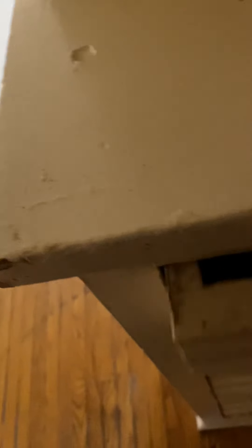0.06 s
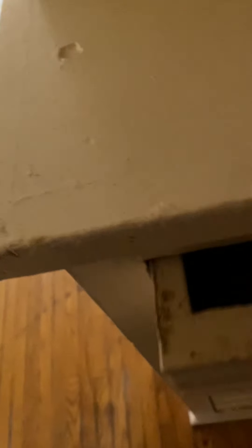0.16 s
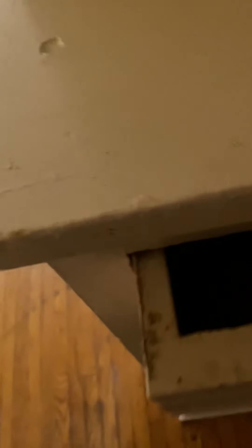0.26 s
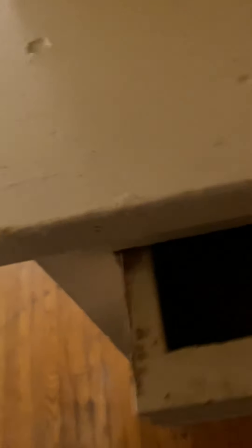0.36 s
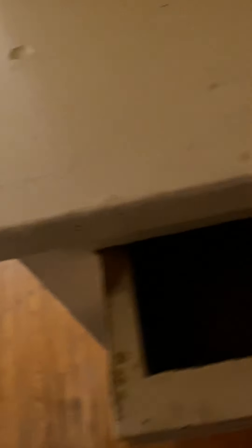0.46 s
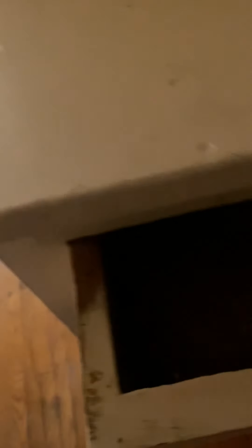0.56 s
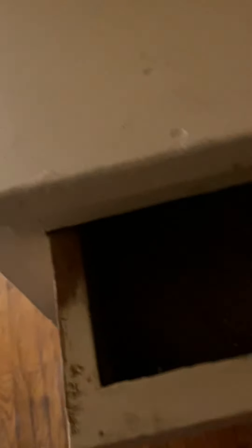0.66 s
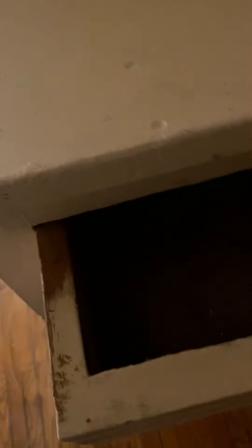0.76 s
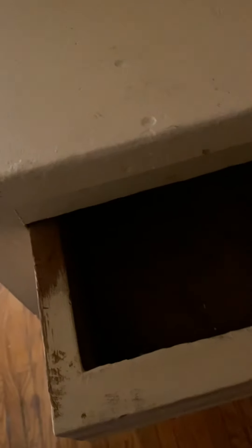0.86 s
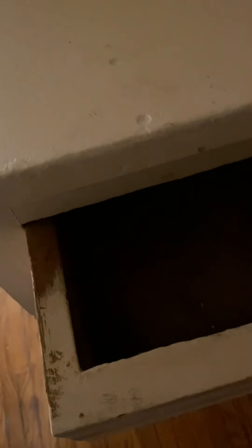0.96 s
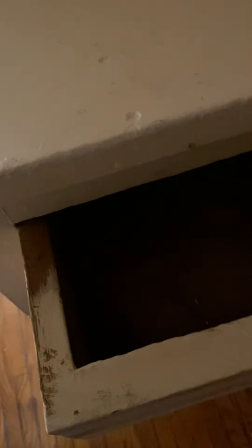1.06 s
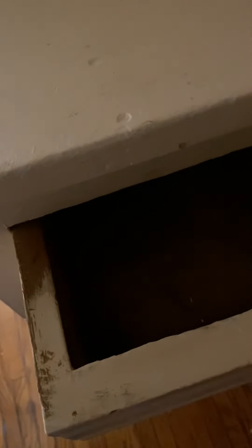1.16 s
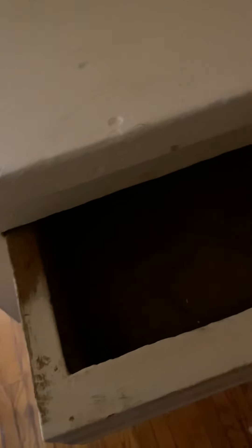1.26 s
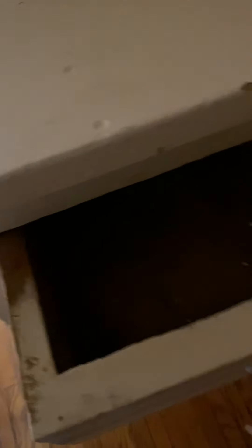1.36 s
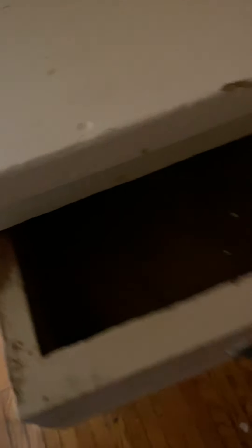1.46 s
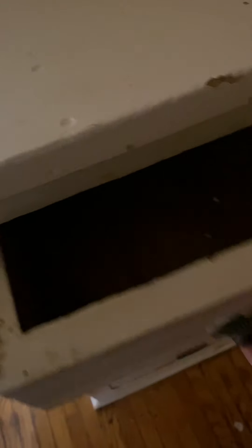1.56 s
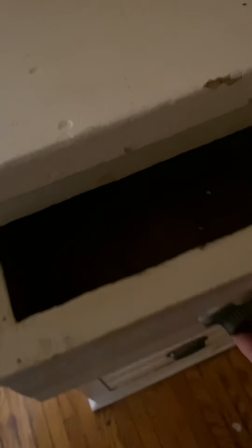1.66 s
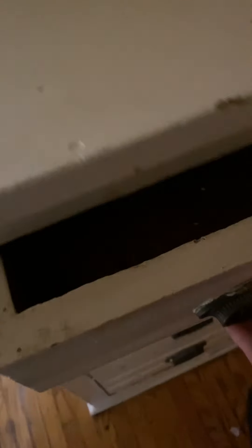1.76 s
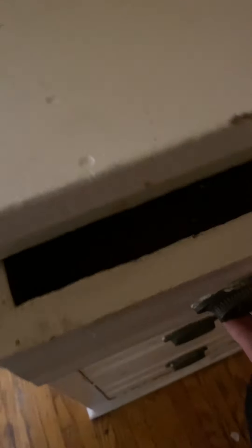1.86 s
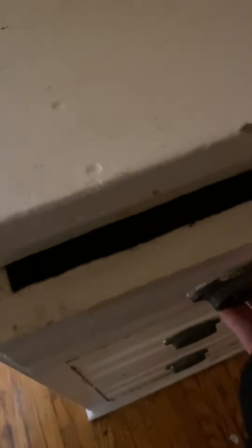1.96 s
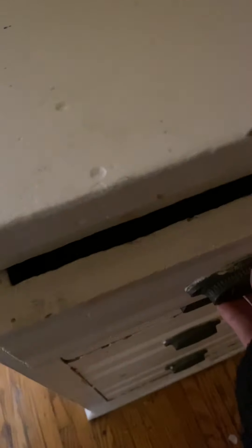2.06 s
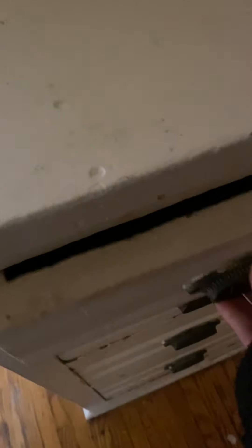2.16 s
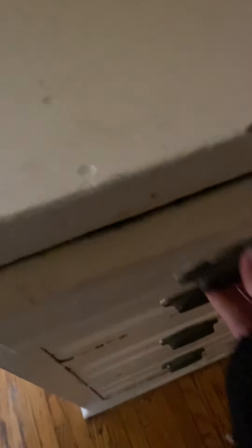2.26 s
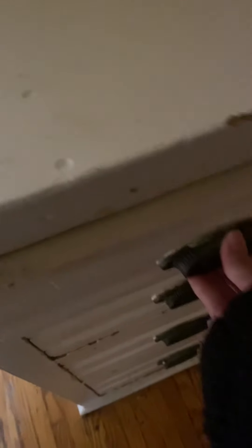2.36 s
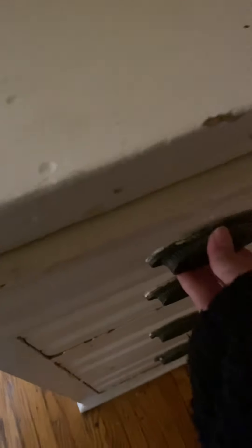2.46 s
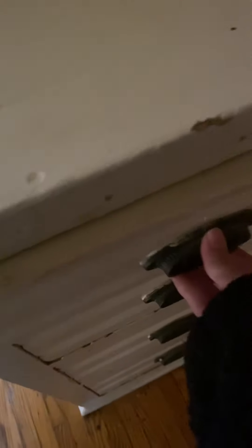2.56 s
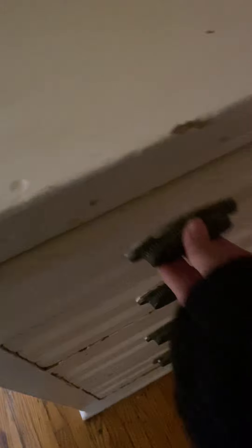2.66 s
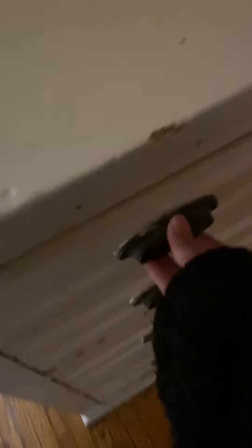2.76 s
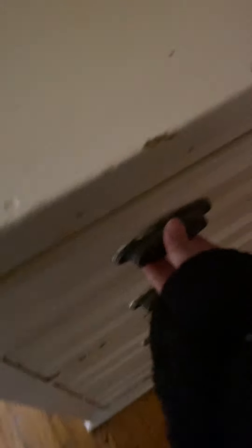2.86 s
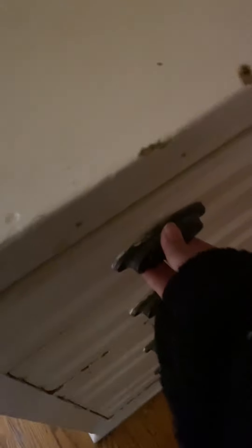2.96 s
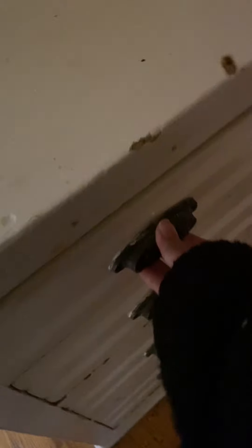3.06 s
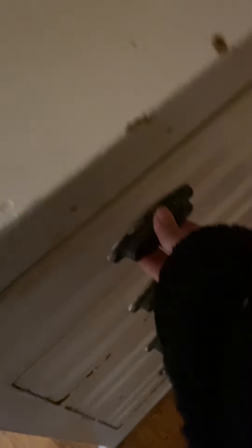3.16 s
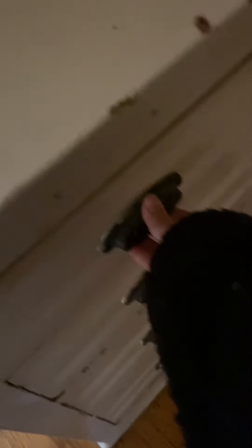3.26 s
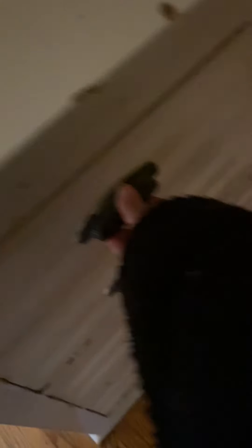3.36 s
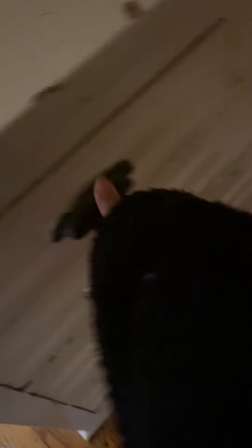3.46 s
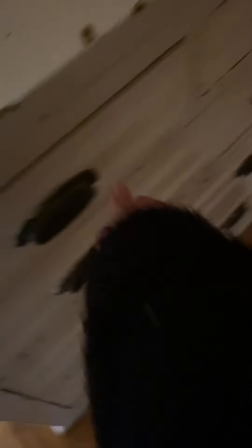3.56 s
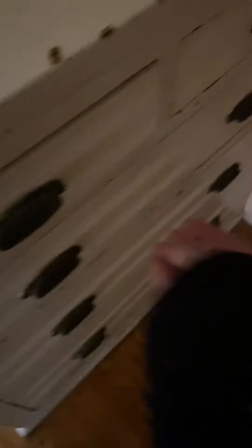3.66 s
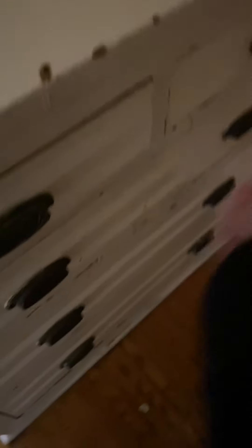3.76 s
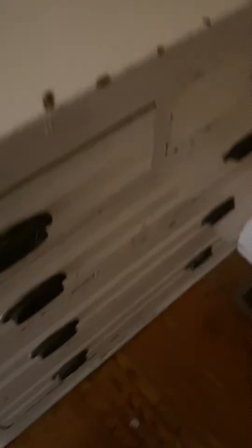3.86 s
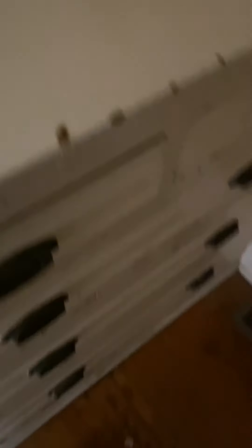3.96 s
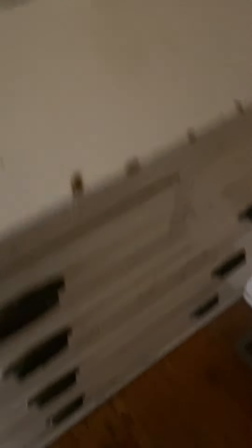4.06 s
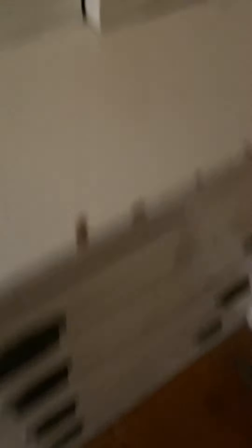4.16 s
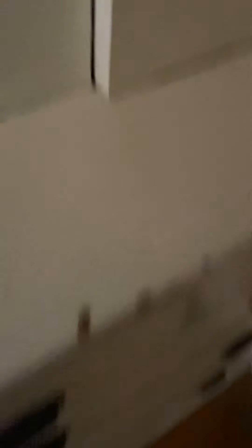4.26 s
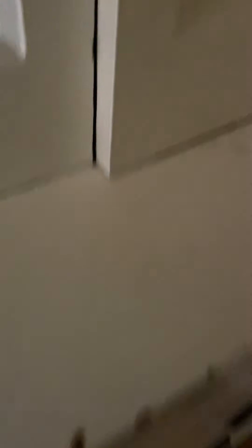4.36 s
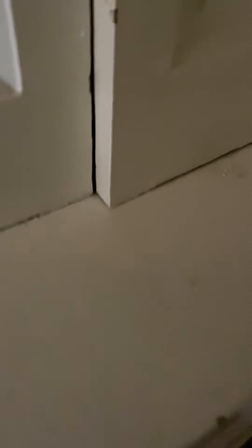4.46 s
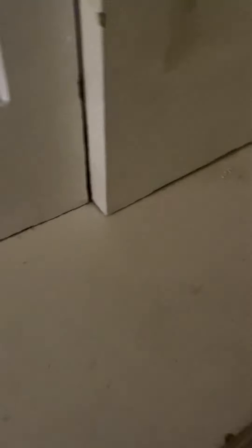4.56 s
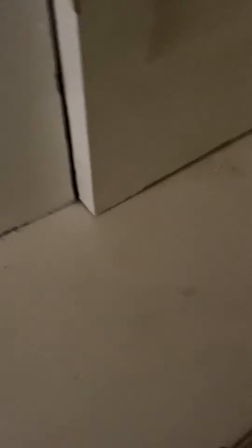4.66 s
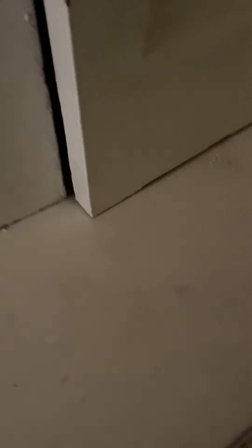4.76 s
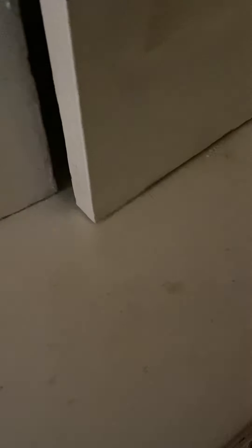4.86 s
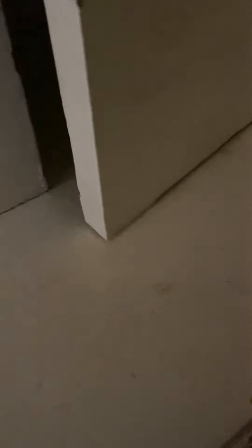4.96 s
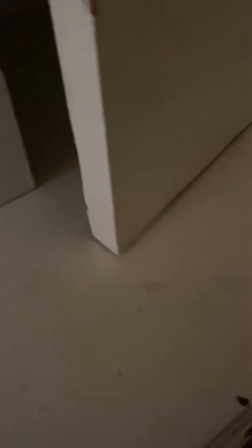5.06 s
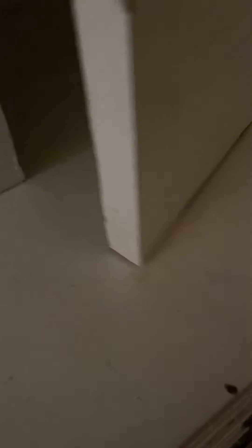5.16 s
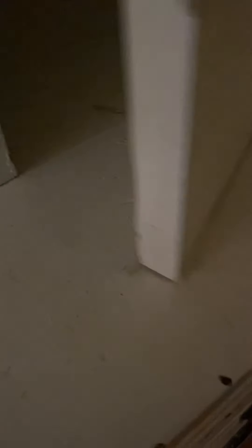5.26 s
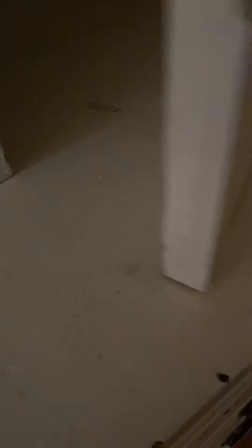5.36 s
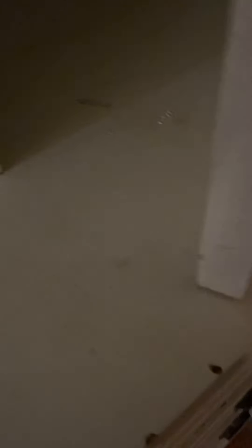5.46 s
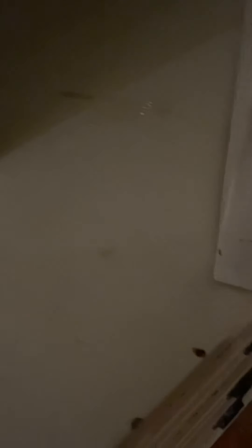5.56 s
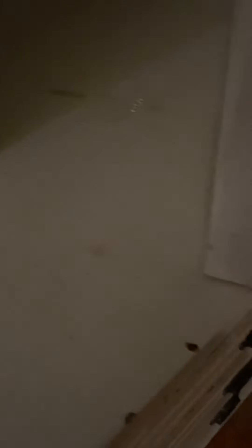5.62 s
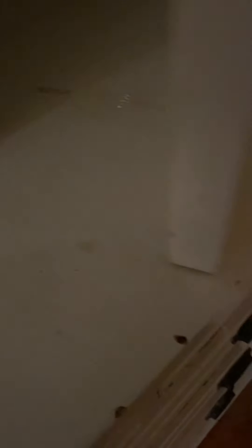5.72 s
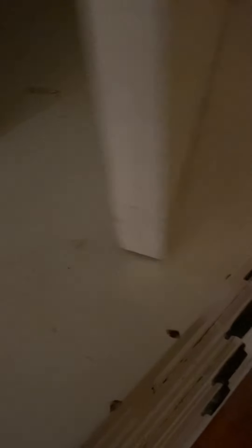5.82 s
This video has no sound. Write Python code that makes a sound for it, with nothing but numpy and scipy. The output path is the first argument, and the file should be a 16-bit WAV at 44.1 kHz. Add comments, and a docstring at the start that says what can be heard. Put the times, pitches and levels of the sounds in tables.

```python
"""A dull thud and rubbing wood start the scene: a drawer slides out, is pushed back, knocks,
squeaks and seats; then a cupboard door is tugged free of its catch and shudders open.
Rubbing, groans and a low hush are shaped noise; thuds and ticks are dying sines set off by contacts;
the short squeak is a stack of partials whose tone dies away in the room.
A bare room echoes blows, ticks and squeak; everything sounds close by."""
import sys
import numpy as np
from scipy import signal
from scipy.fft import rfft, irfft, next_fast_len
from scipy.io import wavfile
from scipy.ndimage import uniform_filter1d

SR = 44100
rng = np.random.default_rng(int(sys.argv[2]) if len(sys.argv) > 2 else 0)


def to_wav(sig):
    """Store sig (one row per channel, or 1-D mono) as 16-bit WAV at the path in sys.argv[1].

    Samples outside -1..1 are clipped; the rate is SR.
    """
    pcm = np.clip(np.atleast_2d(sig), -1, 1) * 32767
    pcm = np.round(pcm).astype(np.int16)
    wavfile.write(sys.argv[1], SR, pcm.T)  # frames by channels


N = 259749
PADDED = next_fast_len(N + SR // 2)
BINS = np.fft.rfftfreq(PADDED, 1 / SR)  # Hz

# strokes of wood and sleeve rubbing: [full from t/s, held/s, scrape level/dB, swell/(dB per s),
# fade/(dB per s), extra level/dB of the body, the part below SPLIT_HZ]
STROKES = [(0.0, .58, -56, 202, 189, 6.5), (1.231, 0.0031, -68, 1505, 236, 18),
           (1.41, .58, -56, 227, 92, 7), (2.21, 0.011, -55, 131, 299, 6), (2.253, 0.033, -44, 595, 376, 7),
           (2.554, 0.053, -56, 599, 107, 5), (2.615, 0.076, -50.5, 219, 215, 13),
           (2.78, 0.056, -56.5, 97, 186, 5), (2.95, 0.06, -65.5, 52, 44, 6),
           (3.255, 0.013, -56.5, 159, 200, 2), (3.276, 0.049, -46.5, 2500, 158, -3.5),
           (3.72, 0.017, -72, 282, 133, -33), (3.999, 0.012, -69, 174, 100, -13),
           (4.066, 0.0044, -55, 480, 186, -1), (4.15, 0.11, -67, 94, 91, 3.5),
           (4.398, 0.0053, -73, 1500, 297, 32.5), (4.583, 0.0082, -58, 2504, 293, 16),
           (4.609, 0.0041, -52.5, 2503, 801, 18), (4.653, 0.004, -47, 3001, 351, 9),
           (4.72, 0.012, -63, 110, 91.5, 18)]
SPLIT_HZ = 1860
# each stroke has a quieter tail, which falls at the same speed for all; a faint rustle never stops
LINGER_DB, LINGER_DB_PER_S, FAINTEST_DB = -15.5, 106.5, -86.5
# tone colour of the scrape, only relative: [f/Hz, level/(dB per Hz)]
SCRAPE_COLOUR = [(240, -28.5), (400, -8.5), (540, -7.5), (620, -14.5), (1400, -14.5), (1570, -10),
                 (1720, -13), (3000, -15), (4100, -17.5), (5330, -14), (7000, -22), (10000, -23.5),
                 (16000, -29)]
# where the rubbing sits: [t/s, left minus right level/dB]
RUB_PAN = [(0, -1), (2.9, -0.5), (5.89, -1)]
# tone colour of the rumble in the carcass, only relative: [f/Hz, level/(dB per Hz)]
RUMBLE_COLOUR = [(15, -66), (25, -4), (59, 3), (139, 0.5), (171, -0.5), (246, -3), (344, -11.5), (545, -22),
                 (910, -27.5), (1540, -120)]
# loudness of that rumble over time: [t/s, level/dB]
RUMBLE_LEVEL = [(0.0, -32.5), (0.1, -37), (0.6, -42.5), (0.76, -54), (1.2, -60.5), (1.42, -38),
                (1.95, -39.5), (2.12, -48.5), (2.33, -38), (2.55, -54), (2.7, -37), (2.86, -51), (3.6, -64),
                (4.0, -56.5), (4.2, -48), (4.58, -42.5), (4.7, -25), (4.84, -33), (4.93, -34.5),
                (5.2, -47.5), (5.89, -48.5)]

# dull blows on carcass and door:
# [t/s, peak level/dB, favoured f/Hz, contact length/ms, damping as a factor on the ring time]
THUDS = [(0.0, -23, 72, 4.2, 0.33), (1.23, -39, 260, 0.97, 0.11), (1.435, -38, 61.9, 3.1, 0.35),
         (2.253, -18.5, 103.3, 3.9, 0.2), (2.637, -25.5, 82, 2.5, 0.66), (2.7, -31.5, 78, 1.7, 0.52),
         (3.285, -24, 124, 2.8, 0.17), (3.575, -44, 100.6, 2.7, 0.4), (4.062, -27.5, 119.5, 5.2, 0.071),
         (4.182, -32.5, 110.4, 7.3, 0.37), (4.65, -27, 68.6, 1.5, 0.12), (4.7, -8.5, 149, 1.3, 0.12),
         (4.727, -7.5, 99.6, 4.2, 0.11), (4.761, -14, 64.4, 2.3, 0.057), (4.819, -16.5, 90.3, 3.6, 0.37),
         (4.841, -16, 96.5, 5.2, 0.19), (4.954, -16.5, 155, 4.16, 0.13)]
# how the carcass rings, before each blow's shifts and damping: [f/Hz, level/dB, time to fall 60 dB/s]
CARCASS_MODES = [(51, -3, .8), (73, -2, .8), (105, 0, .7), (135, -5, .5), (168, 0, .6), (210, -8, .4),
                 (262, -7, .5), (296, -12, .45), (367, -12, .7), (440, -17, .4), (505, -11, .45),
                 (620, -20, .3)]
# how the cupboard door rings, likewise: [f/Hz, level/dB, time to fall 60 dB/s]
DOOR_MODES = [(52.7, 0, 2.1), (79.9, -0.5, 0.6), (99.4, 3, 0.63), (161.7, -1.5, 0.86), (260, -2.5, 0.74),
              (363.3, -10.5, 1.3), (544, -5, 0.68)]
DOOR_FROM_S = 4.3  # blows after this land on the door

# sharp ticks of catch and drawer front:
# [t/s, peak level/dB, low modes level/dB, treble modes level/dB, left minus right level/dB]
TICKS = [(1.23, -46.5, -9, -2.5, -1), (2.244, -30.5, -8.5, -1, -7.5), (3.274, -39, -25, -19, 1),
         (4.39, -32.5, -18, -15, 0), (4.518, -31, -26, -21.5, -2), (4.57, -40, -18, -18, -0.5),
         (4.605, -32, -11, 7, 2), (4.65, -32, -19, -5.5, -1), (4.811, -29, -17.5, -17, -0.5)]
# how painted wood rings, before each tick's shifts: [f/Hz, level/dB, time to fall 60 dB/s]
PANEL_MODES = [(505, 0, .07), (545, -2, .06), (870, -2, .02), (1120, -8, .006), (1500, 0, .0055),
               (1800, 2, .0055), (2150, 0, .005), (2500, -9, .005), (2900, -3, .008), (3500, -3, .006),
               (5300, 0, .005), (10500, -8, .004)]

# short stick-slip squeak of the runner, then its tone dying away in the room, fading in and out:
# [t/s, RMS level/dB of the first partial, before its wavering]
SQUEAK_LEVEL = [(2.556, -64), (2.614, -29), (2.637, -29.5), (2.644, -23.5), (2.655, -30), (2.666, -26.5),
                (2.71, -47), (2.723, -29.5), (2.74, -38), (2.768, -32), (2.8, -32), (2.826, -61),
                (2.84, -37.5), (2.904, -58), (3.005, -47), (3.03, -64), (3.056, -48.5), (3.086, -54),
                (3.102, -84), (3.144, -55.5), (3.162, -73), (3.224, -57), (3.248, -66)]
# its pitch starts sharp, climbs under pressure, sags on release and settles: [t/s, f/Hz]
SQUEAK_PITCH = [(2.57, 704), (2.6, 678), (2.614, 662), (2.632, 653), (2.668, 672), (2.686, 675),
                (2.71, 651), (2.762, 660)]
PRESS_S, LET_GO_S, EASE_S = 2.612, 2.726, 0.0063  # the hand bears down between these moments
PRESSED_DROP_DB, FREE_DROP_DB = 7.5, 26.5  # drop from first to second partial, before the next two
DULLING_DB, SECOND_DB = 10, 4  # the drop grows while pressed, which also favours the second partial
RASP = 0.15  # flutter added per partial
PRESSED_PAN_DB, FREE_PAN_DB = -4.5, 1  # left minus right; the first also holds before the press

# groans of the drawer bottom as it drags: [t/s, length/s, level/dB, f/Hz]
GROANS = [(0.028, 0.37, -36, 170.7), (0.013, 0.27, -53, 476), (0.35, 0.079, -60, 1590),
          (0.466, 0.23, -41.5, 290), (0.475, .07, -61, 1590), (1.42, 0.31, -63.5, 1560),
          (1.42, 0.25, -39, 301)]
GROAN_WIDTH_HZ = 13.8

# how fast the bare room dies away: [f/Hz, time to fall 60 dB/s]
ROOM_DECAY = [(60, 0.95), (250, 0.3), (700, 0.38), (1600, 0.28), (6000, 0.4)]
# tone colour of the background hush, only relative: [f/Hz, level/(dB per Hz)]
HUSH_COLOUR = [(15, -33), (25, -3.5), (59, 3), (223, -11.5), (372, -23.5), (527, -81.5), (839, -44.5),
               (1080, -32.5), (2560, -35), (6500, -75), (14300, -120)]
HUSH_DB = -47.5
# stereo tone colour, the middle with a dip near 7-8 kHz:
# [f/Hz, level/dB of the middle, level/dB of the middle that enters the side]
STEREO_COLOUR = [(60, 0, -38), (250, 0, -16), (700, 0, -8), (2500, 0, -10), (5000, 0, -12), (6500, -3, 2),
                 (7100, -28, 2), (8100, -28, 2), (8600, 0, 0), (9500, 0, -8), (10300, 0, -30),
                 (11600, 0, -4), (12700, -8, 0), (13300, -26, 0), (14600, -24, -3), (15200, -4, -10)]
EDGE_HZ = 15800

OPPOSITE = np.array([[1], [-1]])  # same sound, opposite sign left and right


def rubbing():
    """Sliding wood gives a scrape; a rumble of the carcass with its own loudness goes along."""
    t = np.arange(N) / SR
    rub = evened(scrape(t))
    body = coloured(rub, 1 / (1 + (BINS / SPLIT_HZ) ** 4))
    body_level, treble_level = stroke_levels(t)
    rumble_level = gain_of(np.interp(t, *np.transpose(RUMBLE_LEVEL)))
    return body_level * body + treble_level * (rub - body) + rumble_level * evened(rumble())


def scrape(t):
    """Countless tiny contacts along the runner make dense, uneven grains of noise."""
    shared, apart = rng.standard_normal((2, N)) * gain_of(2.0 * rng.exponential(1, N))
    grains = shared + 0.49 * OPPOSITE * apart  # contacts spread along the runner
    grip = evened(uniform_filter1d(rng.standard_normal(N), 700))
    grains *= gain_of(0.7 * grip)  # the grip changes
    sound = patchy(coloured(grains, gain_of(read(SCRAPE_COLOUR, BINS))), depth_db=2.6)
    return sound * gain_of(left_right(np.interp(t, *np.transpose(RUB_PAN))))


def rumble():
    """Lumpy noise shakes the carcass, which answers most strongly at its own pitches."""
    shared, apart = rng.standard_normal((2, N))
    lumpiness = evened(uniform_filter1d(rng.standard_normal(N), 1200))
    lumps = (shared + 0.89 * OPPOSITE * apart) * gain_of(1.27 * lumpiness)
    peaks = 1 + sum(1.44 / (1 + ((BINS - hz) / (0.015 * hz)) ** 2) for hz, _, _ in CARCASS_MODES)
    return coloured(lumps, gain_of(read(RUMBLE_COLOUR, BINS)) * peaks)


def stroke_levels(t):
    """Each stroke swells, holds and fades with a tail; their powers add. Rows: body, treble."""
    power = gain_of(FAINTEST_DB) ** 2
    for s, held, db, swell, fade, body_db in STROKES:
        before, after = np.maximum(s - t, 0), np.maximum(t - s - held, 0)
        ending = gain_of(-fade * after) ** 2
        ending += gain_of(LINGER_DB - LINGER_DB_PER_S * after) ** 2
        rise_db = db + np.array([[body_db], [0]]) - swell * before
        power = power + gain_of(rise_db) ** 2 * ending
    return np.sqrt(power)


def thuds():
    """A soft push of a few milliseconds sets wood ringing; the wood takes a moment to get going."""
    out = np.zeros(N)
    draws = rng.standard_normal((len(THUDS), 2, len(CARCASS_MODES)))
    for (s, db, hz, ms, damping), (louder, higher) in zip(THUDS, draws):
        push = np.hanning(int(np.clip(ms, 0.5, 20) * SR / 1000) + 3)
        modes = DOOR_MODES if s > DOOR_FROM_S else CARCASS_MODES
        octaves_away = np.log2(np.transpose(modes)[0] / hz)
        shift_db = louder[:len(modes)] - 6.0 * octaves_away ** 2
        detune = 0.02 * higher[:len(modes)]
        ringing = ring(modes, max(damping, 0.05), shift_db, detune, rise=0.005)
        sound = signal.oaconvolve(ringing, push)
        add(out, s, gain_of(db) * sound / abs(sound).max())
    return out


def ticks():
    """A crack rings the panel, followed by a short gritty scatter of smaller contacts."""
    out, draws = np.zeros((2, N)), rng.standard_normal((len(TICKS), 3000))
    lands = rng.standard_normal((len(TICKS), 2, len(PANEL_MODES)))
    mode_hz = np.transpose(PANEL_MODES)[0]
    for (s, db, low_db, treble_db, pan_db), draw, (louder, higher) in zip(TICKS, draws, lands):
        contacts = 0.04 * draw * np.exp(-np.arange(3000) / (0.009 * SR))
        contacts[0] = 1  # the crack itself
        touch_samples = int(np.clip(5 - 0.6 * treble_db, 4, 20))  # dull ticks touch for longer
        contacts = np.convolve(contacts, np.hanning(touch_samples))
        shift_db = 1.5 * louder + low_db * (mode_hz < 1000) + treble_db * (mode_hz > 2600)
        ringing = ring(PANEL_MODES, 1, shift_db, 0.025 * higher, rise=0.0012)[:8000]
        sound = signal.oaconvolve(ringing, contacts)
        level = gain_of(db + OPPOSITE * pan_db / 2)
        add(out, s, level * sound / abs(sound).max())
    return out


def squeak():
    """Regular slips give a stack of partials, rich under hard pressure; the tone then dies away."""
    out = np.zeros((2, N))
    s, level_db = np.transpose(SQUEAK_LEVEL)
    t = np.arange(s[0], s[-1], 1 / SR)
    pressed = (np.tanh((t - PRESS_S) / EASE_S) - np.tanh((t - LET_GO_S) / EASE_S)) / 2
    climb = pressed * (t - PRESS_S) / (LET_GO_S - PRESS_S)
    drop_db = FREE_DROP_DB + (PRESSED_DROP_DB - FREE_DROP_DB) * pressed + DULLING_DB * climb

    # slow wavering of pitch and level, smaller under pressure
    wavering = evened(uniform_filter1d(rng.standard_normal((2, len(t))), 400))
    wavering = wavering * (1.1 - 0.4 * pressed)
    hz = np.interp(t, *np.transpose(SQUEAK_PITCH))
    turns = np.cumsum(hz * (1 + 0.004 * wavering[0])) / SR

    rasp = evened(uniform_filter1d(rng.standard_normal((9, len(t))), 120))
    above_first = np.sign(np.arange(9))[:, None]
    # upper partials slide a few turns a second
    slide = above_first * rng.standard_normal((9, 1)) * 4 * t
    stack = 0
    for k in range(9):
        partial_db = -drop_db * k ** 0.73 + SECOND_DB * pressed * (k == 1)
        flutter = 1 + RASP * k * rasp[k]  # upper partials flutter most
        stack = stack + gain_of(partial_db) * flutter * np.cos(2 * np.pi * ((k + 1) * turns + slide[k]))

    pressed_side = pressed + (t < PRESS_S) * (1 - pressed)
    pan_db = FREE_PAN_DB + (PRESSED_PAN_DB - FREE_PAN_DB) * pressed_side
    total_db = np.interp(t, s, level_db) + 1.54 * wavering[1] + left_right(pan_db)
    add(out, s[0], np.sqrt(2) * gain_of(total_db) * stack)  # root 2 turns RMS into peak
    return out


def groans():
    """Friction noise through one narrow mode; each groan sets in quickly and dies away."""
    t = np.arange(N) / SR
    noise, out = rng.standard_normal(N), np.zeros(N)
    for s, length, db, hz in GROANS:
        hum = evened(coloured(noise, 1 / (1 + ((BINS - hz) / GROAN_WIDTH_HZ) ** 2)))
        progress = np.clip((t - s) / length, 0, 1)
        out += gain_of(db) * hum * np.sin(np.pi * progress ** 0.35)
    return out


def room(x):
    """Walls return sparse echoes of random sign, each pitch band dying at its own speed."""
    taps = np.zeros((2, SR))
    starts = np.arange(200, SR - 20, 20)  # one echo in every 20 samples
    at = starts + rng.integers(0, 20, (2, (SR - 201) // 20))
    np.put_along_axis(taps, at, rng.choice([-1., 1.], at.shape), 1)
    hz, t, z = signal.stft(taps, SR, nperseg=512)
    decay = gain_of(-60 * t / read(ROOM_DECAY, hz)[:, None])
    tail = signal.istft(z * decay, SR, nperseg=512)[1]
    tail = tail[0] + 0.2 * OPPOSITE * tail[1]  # left and right get nearly the same tail
    return signal.fftconvolve(x, tail / np.linalg.norm(tail[0]), axes=1)[:, :N]


def low_hush():
    """The low hush of an empty house: steady noise, partly opposite on left and right."""
    a, b = rng.standard_normal((2, N))
    noise = np.array([a + 1.67 * b, a - 1.7 * b])
    return gain_of(HUSH_DB) * evened(coloured(noise, gain_of(read(HUSH_COLOUR, BINS))))


def gain_of(db):
    """Turns decibels into a plain multiplier."""
    return 10 ** (np.asarray(db) / 20)


def evened(x):
    """Brings a sound to an RMS of one."""
    return x / np.sqrt(np.mean(x ** 2) + 1e-20)


def left_right(pan_db):
    """Shares a left-minus-right difference in dB equally between both sides."""
    return np.array([pan_db, -pan_db]) / 2


def read(points, hz, column=1):
    """Reads a table between its points, along a logarithmic pitch scale."""
    table = np.transpose(points)
    return np.interp(np.log(hz + 1), np.log(table[0] + 1), table[column])


def coloured(x, gain):
    """Multiplies the spectrum of x, padded with silence, by a gain for each bin."""
    return irfft(rfft(x, PADDED) * gain, PADDED)[..., :N]


def patchy(x, depth_db):
    """Tone colour drifts in patches of roughly 170 Hz and 140 milliseconds."""
    z = signal.stft(x, nperseg=512)[2]
    patches = rng.standard_normal(z.shape[1:])
    patches = uniform_filter1d(patches, size=2, axis=0)
    patches = evened(uniform_filter1d(patches, size=24, axis=1))
    return signal.istft(z * gain_of(depth_db * patches), nperseg=512)[1][:, :N]


def ring(modes, damping, shift_db, detune, rise):
    """Struck wood rings in dying sines, each shifted in level and pitch by where the blow lands."""
    t = np.arange(SR // 2) / SR
    hz, db, t60 = np.transpose(modes)[:, :, None]
    level = gain_of(db + shift_db[:, None] - 60 * t / (t60 * damping))
    sines = np.sin(2 * np.pi * hz * (1 + detune[:, None]) * t)
    return (level * sines).sum(0) * (1 - np.exp(-t / rise))


def add(mix, s, sound):
    """Adds a sound to the mix from second s, cut off at the end."""
    part = mix[..., round(s * SR):][..., :sound.shape[-1]]
    part += sound[..., :part.shape[-1]]


def scene():
    """Adds all sources; blows, cracks and squeak also sound in the room."""
    blows, cracks, voice = thuds(), ticks(), squeak()
    echoed = gain_of(-5.0) * blows + gain_of(-2.5) * cracks + gain_of(-16.5) * voice
    return rubbing() + groans() + blows + cracks + voice + room(echoed) + low_hush()


def record(dry):
    """Colours the middle, lets some of it enter the side, then cuts the top above EDGE_HZ."""
    mid, side = (dry[0] + dry[1]) / 2, (dry[0] - dry[1]) / 2
    little_bass = (BINS ** 2 / (BINS ** 2 + 204.0 ** 2)) ** 2  # left and right share their bass
    mid_in_side = 1j * gain_of(read(STEREO_COLOUR, BINS, column=2))  # 1j shifts by a quarter turn
    side = coloured(side, little_bass) + coloured(mid, mid_in_side)
    bass_roll_off = BINS ** 6 / (BINS ** 6 + 40. ** 6)
    mid = coloured(mid, gain_of(read(STEREO_COLOUR, BINS)) * bass_roll_off)
    edge = signal.firwin(511, EDGE_HZ, window=("kaiser", 9), fs=SR)
    return signal.oaconvolve(np.array([mid + side, mid - side]), edge[None], "same")


dry = scene()
out = record(dry)
to_wav(out)
```